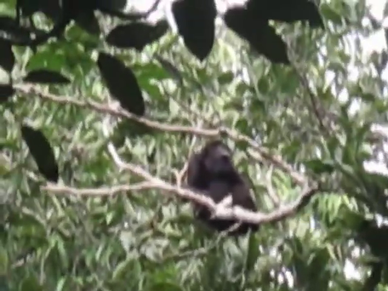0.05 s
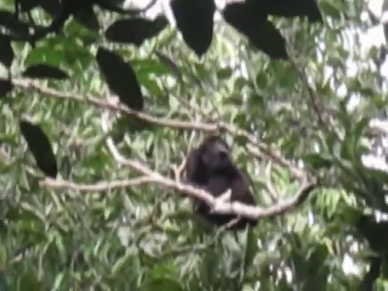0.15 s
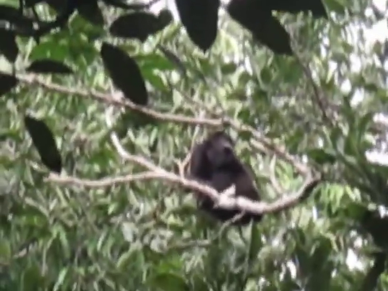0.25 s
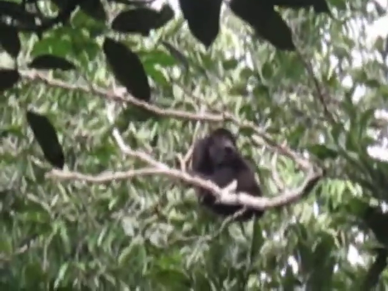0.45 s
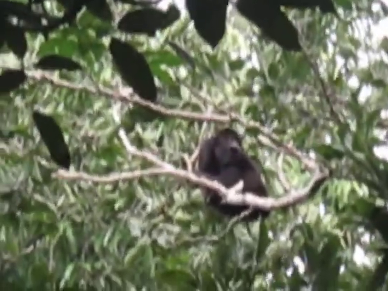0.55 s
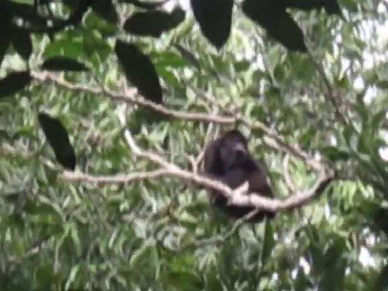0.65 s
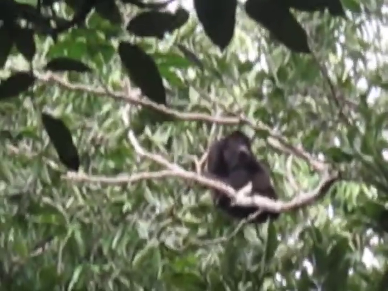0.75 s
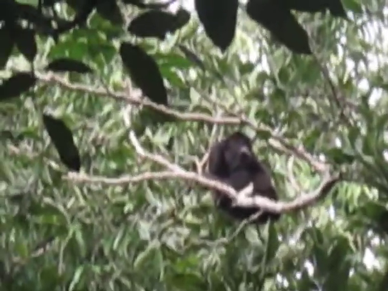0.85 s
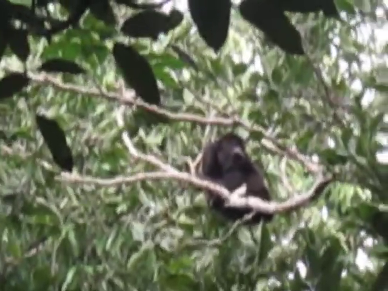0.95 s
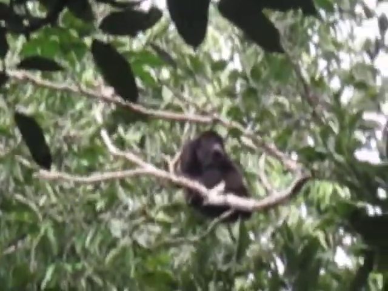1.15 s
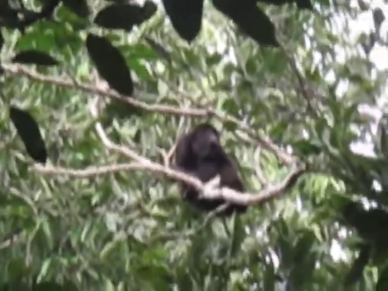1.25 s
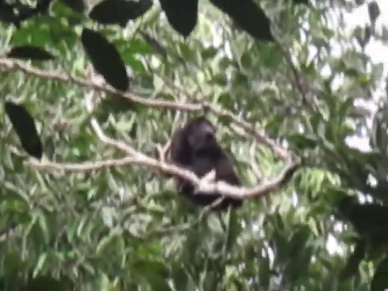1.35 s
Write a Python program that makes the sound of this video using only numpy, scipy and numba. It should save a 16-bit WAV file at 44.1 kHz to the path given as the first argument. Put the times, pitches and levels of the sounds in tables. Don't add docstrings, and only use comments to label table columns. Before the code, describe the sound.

A howler monkey draws a thin whooping breath, grunts, then gives two hoarse, hollow barks run together; the forest echoes them, then a faint moan, leaf rustle and second whoop follow. Distant handheld camera microphone.

```python
import sys
import numpy as np
from scipy import signal
from scipy.io import wavfile
from scipy.ndimage import uniform_filter1d
from numba import njit

SR = 44100
rng = np.random.default_rng(int(sys.argv[2]) if len(sys.argv) > 2 else 0)


def gain_from_decibels(decibels):
    exponent = np.asarray(decibels, float) / 20
    return 10 ** exponent


def unload_wav(signal):
    wavfile.write(
        sys.argv[1],
        SR,
        np.round(np.clip(np.atleast_2d(signal).T, -1, 1) * 32767).astype(np.int16),
    )


N = 61739

# (time [s], hum level [dB], roar level [dB])
FIRST_BARK = [
    (0.194, -84, -50),
    (0.221, -38.5, -48.5),
    (0.239, -34, -42),
    (0.257, -37.5, -32),
    (0.302, -32.5, -26),
    (.355, -36, -28.5),
    (.395, -35.5, -28.5),
    (.42, -36.5, -39.5),
    (.465, -42.5, -38.5),
]
SECOND_BARK = [
    (.515, -30.5, -39.5),
    (0.534, -30, -30),
    (0.548, -36, -26),
    (.572, -48, -24.5),
    (.605, -56, -25),
    (.635, -42.5, -27.5),
    (0.659, -33.5, -29.5),
    (.70, -37.5, -50),
    (0.742, -68, -51.5),
]
# (time [s], pitch [Hz])
HUM_PITCH = [
    (.20, 366),
    (.235, 378),
    (.26, 345),
    (.32, 336),
    (.40, 355),
    (.465, 355),
    (.53, 366),
    (.66, 362),
    (.72, 352),
]
HUM_HARMONICS = [-1, 1, -12, -11, -12, -24]
# (centre [Hz], width [Hz], level [dB])
THROAT_RESONANCES = [(328, 135, -17), (447, 82, -11.5), (603, 106, -9.5), (714.3, 72, -4.5),
                     (1069, 120, -12.5), (1158, 42, -5.5), (1235, 36.5, -4.5), (1443, 118, -2),
                     (1556, 39, -2.5), (1639.5, 36, -4), (1762, 94, -5), (1876, 37, -10.5)]
# (centre [Hz], width [Hz], level [dB])
MOUTH_RESONANCES = [(2020, 117, -1.5), (2224, 65, -1.5), (2615, 140, -14.5), (2822, 55, -6),
                    (3060, 200, -12), (3299, 59, -10), (3683, 105, -8.5), (4070, 180, -17.5),
                    (4530, 440, -17.5)]
# (centre [Hz], width [Hz], level [dB])
RASP_RESONANCES = [(5200, 98, -8), (6040, 70, -9.5), (6526, 160, -2.5), (7130, 120, -3.5),
                   (7650, 68, -10.5), (8060, 97, -5), (8580, 330, -6.5), (9900, 130, -9), (10300, 89, -16),
                   (10900, 320, -15), (7860, 4600, 0.5)]
# (centre [Hz], width [Hz], level [dB])
GRUNT_RESONANCES = [(356, 102, -2), (607, 176, -2.5), (1200, 57, -19), (1462, 92, -5.5), (1730, 43, -22),
                    (2024, 130, -10.5)]
# (start [s], length [s], pitch [Hz], fall [Hz/s], level [dB])
THROAT_TONES = [
    (.08, .07, 1775, -200, -60),
    (.183, .07, 1490, 500, -47),
    (.245, .06, 1735, 0, -36),
    (.355, .065, 1560, 100, -29),
    (.41, .17, 1050, -650, -41),
    (.47, .075, 1775, -1000, -41),
    (.535, .045, 1520, 0, -30),
    (.588, .052, 1545, 0, -23),
    (.615, .06, 1170, 200, -31),
    (1.365, .06, 1780, 0, -61),
]
# (start [s], length [s], pitch [Hz], fall [Hz/s], level [dB])
CHEST_TONES = [
    (0.145, 0.074, 148, -17, -59),
    (.26, 0.14, 155, 381, -59),
    (0.275, 0.037, 205, 7.5, -49),
    (0.34, 0.043, 215, 0, -54),
    (0.587, 0.062, 240, 3, -50),
]
# (start [s], length [s], level [dB], delay of pitch step [s])
IN_BREATHS = [
    (0.08, .095, -51.5, .038),
    (1.355, 0.108, -51, 0.026),
]
# (centre [Hz], width [Hz], level [dB])
BREATH_RESONANCES = [(1076, 20, -4), (1220, 190, -4), (1762, 40, -12), (3070, 430, -15), (4360, 300, -18)]
# (delay [s], level [dB])
TREE_WALLS = [
    (.25, -26.5),
    (.37, -30.5),
]
# (start [s], length [s], level [dB])
LEAF_RUSTLES = [
    (1.3, .02, -86),
    (1.25, 0.038, -65.5),
    (1.288, 0.015, -68),
    (1.202, 0.23, -67),
]
# (centre [Hz], width [Hz], level [dB])
LINGERING_MURMUR = [(356, 102, 0.5), (715, 100, -2.5), (1210, 87, -5), (1470, 100, -5.5), (1763, 69, -8)]
# (frequency [Hz], level [dB])
AIR_SPECTRUM = [(25, 6.5), (70, -9.5), (200, -2.5), (500, -5.5), (1000, -3.5), (2300, -19.5), (5000, -16),
                (11000, -22)]


def level(x, db):
    return x * gain_from_decibels(db) / np.sqrt(np.mean(x ** 2))


@njit
def svf(x, hz, width_hz):
    out, band, low = np.empty(len(x)), 0., 0.
    for i in range(len(x)):
        g, k = np.tan(np.pi * hz[i] / SR), width_hz / hz[i]
        v = (band + g * (x[i] - low)) / (1 + g * (g + k))
        band = 2 * v - band
        low += 2 * g * v
        out[i] = k * v
    return out


def walk(rate_hz):
    hold = int(SR / rate_hz)
    steps = np.repeat(rng.standard_normal(N // hold + 1), hold)
    return 1.472 * uniform_filter1d(uniform_filter1d(steps, hold), hold)[:N]


def resonate(x, table, drift=0.0038):
    out = 0
    for k, (hz, width_hz, db) in enumerate(table):
        centre = hz * (1 + drift * walk(20))
        once = svf(x, centre, 1.55 * width_hz)
        twice = svf(once, centre, 1.55 * width_hz)
        out = out + (-1) ** k * level(twice, db)
    return level(out, 0)


def bump(t, start, length, attack):
    return np.clip(np.minimum(t - start, start + length - t) / attack, 0, 1) ** 2


def sine(hz):
    return np.sqrt(2) * np.sin(2 * np.pi * np.cumsum(hz) / SR)


def lagged(t, x, lag_s):
    return uniform_filter1d(np.interp(t - lag_s, t, x), int(0.036 * SR))


def howler(t):
    when, hum_db, roar_db = np.vstack([FIRST_BARK, SECOND_BARK]).T
    on = (t > when[0]) & (t < when[-1])
    hum_db, roar_db = np.interp(t, when, hum_db), np.interp(t, when, roar_db)
    folds = hum(t, hum_db, roar_db) * gain_from_decibels(hum_db) + roar() * gain_from_decibels(roar_db)
    return on * folds + mouth(t, hum_db, roar_db) + rasp(t, roar_db)


def hum(t, hum_db, roar_db):
    jitter, shimmer_db = .014, 3.0
    overtone_loss = 0.43
    settled_s, unsettled_db = .39, -11
    hz = np.interp(t, *np.array(HUM_PITCH).T) * (1 + jitter * walk(220))
    phase = 2 * np.pi * np.cumsum(hz) / SR
    overtone_db = -overtone_loss * np.clip(roar_db - hum_db + 2.5, 0, 20)
    overtone_db = overtone_db + unsettled_db * np.clip((settled_s - t) / .05, 0, 1)
    out = 0
    for k, db in enumerate(HUM_HARMONICS):
        gain = gain_from_decibels(db + (k > 0) * overtone_db + shimmer_db * walk(49.8))
        out = out + gain * np.sin((k + 1) * phase + k * k)
    return np.sqrt(2) * out


def roar():
    slap_hz, jitter, scatter_db, air_gain = 330, .5, 3, .8
    skirt_db, skirt = -13.5, [(1250, 1030, 0)]
    timing, strength = rng.standard_normal((2, 1200))
    at = (np.cumsum(np.exp(jitter * timing)) * SR / slap_hz).astype(int)
    slaps = np.zeros(N)
    slaps[at[at < N]] = gain_from_decibels(scatter_db * strength)[at < N]
    folds = level(slaps, 0) + air_gain * rng.standard_normal(N)
    broad = resonate(resonate(folds, skirt), skirt)
    return resonate(folds, THROAT_RESONANCES) + level(broad, skirt_db)


def mouth(t, hum_db, roar_db):
    mouth_db, hum_share_db, lag_s = -17, 3.5, 0.034
    effort = np.hypot(gain_from_decibels(roar_db), gain_from_decibels(hum_db + hum_share_db))
    air = resonate(rng.standard_normal(N), MOUTH_RESONANCES)
    return air * gain_from_decibels(mouth_db) * lagged(t, effort, lag_s)


def rasp(t, roar_db):
    rasp_db, lag_s, power = -56, 0.034, 0.94
    air = rng.standard_normal(N) * gain_from_decibels(0.81 * walk(260))
    course_db = rasp_db + power * (lagged(t, roar_db, lag_s) + 27.5)
    return resonate(air, RASP_RESONANCES) * gain_from_decibels(course_db)


def grunt(t):
    start_s, attack_s, fade_s, grunt_db = .184, .007, .07, -41
    since = np.maximum(t - start_s, 0)
    envelope = np.clip(since / attack_s, 0, 1) * np.exp(-(since / fade_s) ** 2)
    return resonate(rng.standard_normal(N), GRUNT_RESONANCES) * gain_from_decibels(grunt_db) * envelope


def tones(t, table, wobble):
    out, shake = 0, 1 + wobble * walk(62.05)
    for start, length, hz, fall, db in table:
        pitch = np.clip(hz - fall * (t - start), 60, 2000) * shake
        out = out + gain_from_decibels(db + 1.26 * walk(81.3)) * bump(t, start, length, length / 3) * sine(pitch)
    return out


def whoops(t):
    low_hz, rise_hz, step_s, attack_s = 492, 96, .005, .012
    lead_s, breath_db = .03, -3.0
    out, breath = 0, gain_from_decibels(breath_db) * resonate(rng.standard_normal(N), BREATH_RESONANCES)
    for start, length, db, step in IN_BREATHS:
        hz = low_hz + rise_hz * np.clip((t - start - step) / step_s + .5, 0, 1)
        tone = sine(hz * (1 + .008 * walk(150))) * gain_from_decibels(1.5 * walk(60))
        tone = tone * bump(t, start, length, attack_s)
        air = breath * bump(t, start - lead_s, length + lead_s - .015, 0.042)
        out = out + gain_from_decibels(db) * (tone + air)
    return out


@njit
def trees(x, lags, gain, damp):
    line, soft, out = np.zeros((8, 8192)), np.zeros(8), np.zeros(len(x))
    for i in range(len(x)):
        total = 0.
        for k in range(8):
            soft[k] += (1 - damp) * (gain[k] * line[k, (i - lags[k]) & 8191] - soft[k])
            total += soft[k]
            out[i] += soft[k] * (1 - 2 * (k % 2))
        for k in range(8):
            line[k, i & 8191] = x[i] + soft[k] - total / 4
    return out / np.sqrt(8)


def forest(t, monkey):
    t60_s, damp, forest_db = 0.71, 0.0078, -6.5
    lags = np.array([743, 1021, 1327, 1613, 1987, 2341, 2749, 3187])
    scatter = trees(monkey + 1e-18, lags, gain_from_decibels(-60 * lags / SR / t60_s), damp)
    far = sum(gain_from_decibels(db) * np.interp(t - delay, t, monkey) for delay, db in TREE_WALLS)
    return gain_from_decibels(forest_db) * scatter + far


def moan(t):
    start_s, end_s, attack_s = 1.115, 1.385, .035
    pitch_hz, sway_hz, moan_db = 334, 12, -58.5
    hz = pitch_hz + sway_hz * walk(150)
    tone = gain_from_decibels(2.2 * walk(50)) * (sine(hz) + gain_from_decibels(-10) * np.sqrt(2) ** -1 * sine(2 * hz))
    return tone * gain_from_decibels(moan_db) * bump(t, start_s, end_s - start_s, attack_s)


def leaves(t):
    grain = rng.standard_normal(N) * gain_from_decibels(1.4 * walk(400))
    rustle = level(svf(grain, np.full(N, 7500.), 12000.), 0)
    return rustle * sum(gain_from_decibels(db) * bump(t, s, length, length / 3) for s, length, db in LEAF_RUSTLES)


def insect():
    pitch_hz, waver_hz, insect_db = 5870, 6.5, -74.5
    return gain_from_decibels(insect_db + 1.2 * walk(60)) * sine(pitch_hz + waver_hz * walk(29.1))


def lingering_murmur():
    return gain_from_decibels(-61 + 0.6 * walk(8)) * resonate(rng.standard_normal(N), LINGERING_MURMUR)


def jungle_air():
    band_hz, band_db = np.array(AIR_SPECTRUM).T
    out = 0
    for hz in 30 * 2 ** np.arange(0, 8.6, .5):
        db = np.interp(np.log(hz), np.log(band_hz), band_db) + 1.4 * walk(7)
        out = out + gain_from_decibels(db) * svf(rng.standard_normal(N), np.full(N, hz), hz / 1.8)
    return level(out, -61)


def scene():
    t = np.arange(N) / SR
    monkey = howler(t) + grunt(t) + tones(t, THROAT_TONES, .004) + whoops(t)
    chest = tones(t, CHEST_TONES, .03)
    background = moan(t) + leaves(t) + insect() + lingering_murmur() + jungle_air()
    return (monkey + chest + forest(t, monkey) + background)[None]


def top_cut(x):
    return signal.sosfilt(signal.butter(12, 15640, fs=SR, output="sos"), x)


def record(dry):
    top_hz, hiss_db = 10800, -74.5
    notch_hz, notch_width_hz = 11670, 610
    low_pass = signal.butter(8, top_hz, fs=SR, output="sos")
    high_pass = signal.butter(4, 11500, "high", fs=SR, output="sos")
    edges_hz = [notch_hz - notch_width_hz / 2, notch_hz + notch_width_hz / 2]
    notch = signal.butter(2, edges_hz, "bandstop", fs=SR, output="sos")
    hiss = gain_from_decibels(hiss_db) * signal.sosfilt(high_pass, rng.standard_normal(dry.shape))
    mix = signal.sosfilt(notch, signal.sosfilt(low_pass, dry) + hiss)
    return top_cut(mix)


dry = scene()
out = record(dry)
unload_wav(out)
```